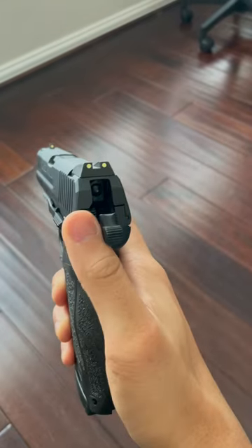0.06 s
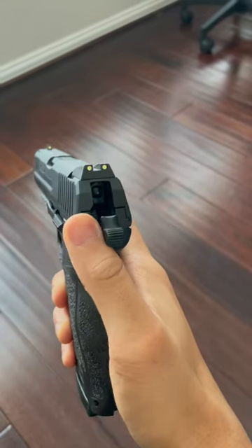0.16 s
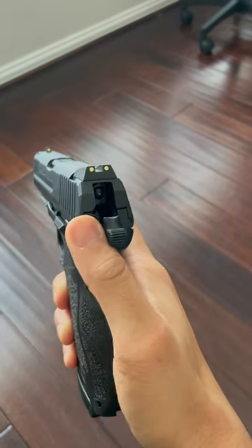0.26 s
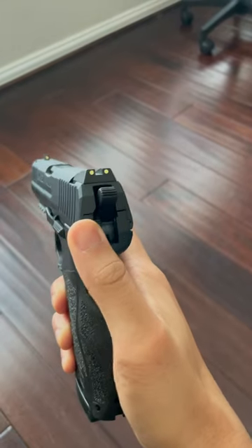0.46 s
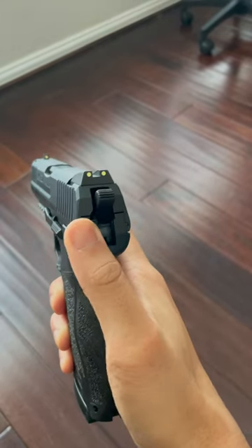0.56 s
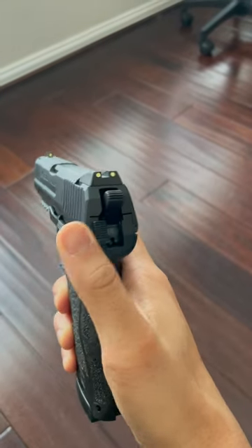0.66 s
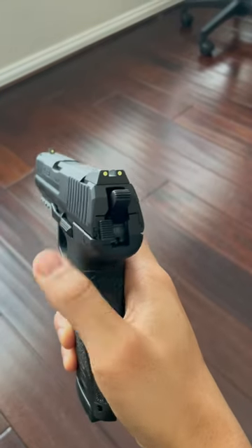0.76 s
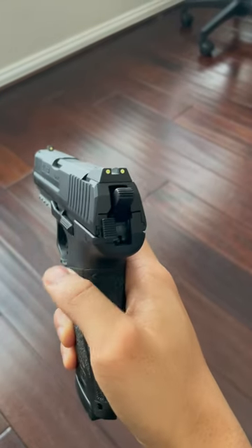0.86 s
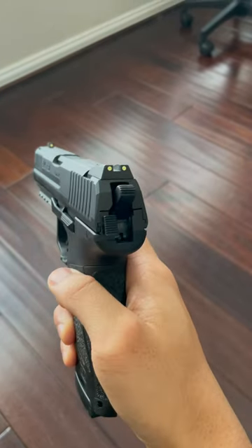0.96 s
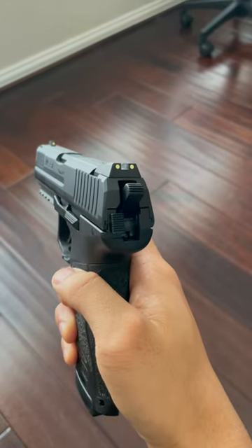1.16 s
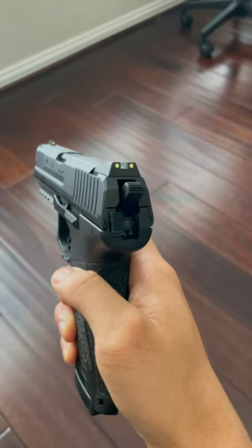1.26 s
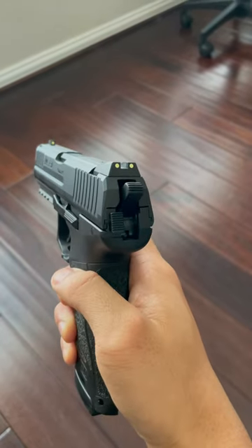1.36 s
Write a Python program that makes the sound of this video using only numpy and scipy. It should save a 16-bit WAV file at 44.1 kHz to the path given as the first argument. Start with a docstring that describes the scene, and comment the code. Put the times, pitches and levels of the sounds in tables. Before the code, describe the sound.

One crisp, close steel click sounds as a pistol is decocked in a quiet room. Its echo lingers briefly as a faint hiss, leaving only a low ventilation rumble and electrical hum.

```python
"""A quiet room with a wooden floor, a stereo microphone close to a pistol being decocked.
The sear lets go and the hammer clatters down in about fifteen milliseconds, ringing the steel
and jolting the frame in the hand. The recorder's limiter ducks on the click and recovers,
so the room's ring swells back as a soft hiss over ventilation rumble and a low mains hum."""
import sys
import numpy as np
from scipy import signal
from scipy.fft import rfft, irfft, next_fast_len
from scipy.io import wavfile
from scipy.ndimage import uniform_filter1d, minimum_filter1d

SR = 44100
rng = np.random.default_rng(int(sys.argv[2]) if len(sys.argv) > 2 else 0)


def generate_wav(signal):
    """Clip the signal to [-1, 1] and save it as 16-bit WAV at the path in sys.argv[1]."""
    frames = np.transpose(np.atleast_2d(signal))
    scaled = np.clip(frames, -1, 1) * 32767
    pcm = np.round(scaled).astype(np.int16)
    wavfile.write(sys.argv[1], SR, pcm)


N = 61739


def from_db(db):
    """Decibels to gain."""
    return 10 ** (np.asarray(db) / 20)


def rms_one(x):
    """Scale to rms 1."""
    return x / np.sqrt(np.mean(x ** 2) + 1e-20)


def at_hz(points, hz):
    """Read a table on a log-frequency axis."""
    freqs_hz, values = np.transpose(points)
    return np.interp(np.log(np.maximum(hz, 1)), np.log(freqs_hz), values)


def shaped(x, response):
    """Filter by a response given as a function of frequency."""
    size = next_fast_len(2 * N)
    spectrum = rfft(x, size)
    hz = np.arange(spectrum.shape[-1]) * SR / size
    return irfft(spectrum * response(hz), size)[..., :N]


def coloured(x, colour):
    """Filter by a table of freq_hz, gain_db."""
    return shaped(x, lambda hz: from_db(at_hz(colour, hz)))


def decay(start_s, t60_s):
    """Envelope that jumps to 1 and dies away."""
    age_s = np.arange(N) / SR - start_s
    return (age_s >= 0) * 1000 ** (-np.clip(age_s / t60_s, 0, 10))


# Stereo width of the room at the microphone: freq_hz, side_minus_mid_db
ROOM_WIDTH = [(60, -35), (250, -16), (600, 0), (1700, -13), (3100, -1), (4200, -6.5), (5000, -1.5),
              (6500, -15.5), (10000, -43), (14000, -12)]
def diffuse_noise():
    """Sound from all around, alike in both channels in the bass and less so above."""
    mid, side = rng.standard_normal((2, N))
    width = lambda hz: from_db(at_hz(ROOM_WIDTH, hz))
    mid = shaped(mid, lambda hz: 1 / np.hypot(1, width(hz)))
    side = shaped(side, lambda hz: width(hz) / np.hypot(1, width(hz)))
    return np.array([mid + side, mid - side])


def tones(table):
    """Steady sines at the given rms levels, each with a random phase."""
    t = np.arange(N) / SR
    return sum(from_db(db) * np.sqrt(2) * np.sin(2 * np.pi * (hz * t + rng.random())) for hz, db in table)


# Ventilation rumble all round the microphone: freq_hz, gain_db
VENT_COLOUR = [(5, -29.5), (18, -6), (30, -5), (58, 6.5), (90, -5.5), (135, 4.5), (180, -8), (260, -8.5),
               (350, -19.5), (600, -29), (850, -39), (1200, -44.5), (2500, -52.5), (6000, -58.5),
               (16000, -69)]
# Mains hum in the background: pitch_hz, level_db
MAINS_HUM = [(119, -54.5), (241, -65)]
# Faint whines in the background: pitch_hz, level_db
FAINT_WHINES = [(797, -88), (851, -83)]
def ventilation(rumble_db=-48, whine_from_s=0.3, whine_fade_s=0.1):
    """Room tone: steady low rumble and mains hum, with faint whines fading in after the click."""
    rumble = from_db(rumble_db) * rms_one(coloured(diffuse_noise(), VENT_COLOUR))
    fade_in = np.clip((np.arange(N) / SR - whine_from_s) / whine_fade_s, 0, 1)
    return rumble + tones(MAINS_HUM) + tones(FAINT_WHINES) * fade_in


# Colour of the reflections reaching the microphone: freq_hz, gain_db
REFLECTION_COLOUR = [(100, -16.5), (350, -25), (600, -8.5), (920, -6.5), (1250, -3), (1580, -2.5),
                     (1900, 4.5), (2400, 2), (3050, -6), (3700, 6.5), (4300, 1), (4800, -2), (6300, 5),
                     (8800, 3), (10300, -24), (12200, 4.5), (13800, -2), (15500, -21)]
# How long the room rings: freq_hz, t60_s
ROOM_DECAY = [(200, 0.41), (800, 0.9), (2000, 0.87), (4000, 0.83), (7000, 0.71), (10000, 0.51),
              (14000, 0.45)]
def room(x, delay_s=0.0042, early_db=-37.5, early_t60_s=0.05, late_db=-49.5):
    """Quick reflections off hand, body and floor, then a diffuse ring whose treble fades early."""
    noise = coloured(diffuse_noise(), REFLECTION_COLOUR)
    early = noise[:, ::-1] * decay(delay_s, early_t60_s)
    centres_hz, t60s_s = np.transpose(ROOM_DECAY)
    late = np.zeros((2, N))
    for share, t60_s in zip(np.eye(len(centres_hz)), t60s_s):
        band = shaped(noise, lambda hz: at_hz(np.c_[centres_hz, share], hz))
        late += band * decay(delay_s, t60_s)
    reflections = from_db(late_db) * late + from_db(early_db) * early
    return signal.fftconvolve(x[None], reflections, axes=1)[:, :N]


# Swings of the frame in the hand, heard close up: start_s, pitch_hz, level_db, t60_s
FRAME_SWINGS = [(0.2419, 443.2, 12, 0.0082), (0.2430, 209.2, 1.5, 0.0098), (0.2450, 89.85, 4.5, 0.028),
                (0.2505, 45.4, -7, 0.071)]
def frame_jolt(low_cut_hz=35):
    """The stopped hammer knocks the frame, which thumps into the hand and rocks to and fro."""
    t = np.arange(N) / SR
    thump = np.zeros(N)
    for k, (start_s, hz, level_db, t60_s) in enumerate(FRAME_SWINGS):
        swing = decay(start_s, t60_s) * np.sin(2 * np.pi * hz * (t - start_s))
        thump += (-1) ** k * from_db(level_db) * swing
    low_cut = signal.butter(1, low_cut_hz, "high", fs=SR, output="sos")
    return signal.sosfilt(low_cut, thump + 1e-18)


# Steel striking steel close to the microphone, with a level for each of five bands, low to high:
# start_s, knock_db, clack_db, ring_db, crack_db, sizzle_db
STEEL_CONTACTS = [(0.227, -28.5, -15, -18, -46, -50.5), (0.232, -5.5, 2, 0, -24, -31),
                  (0.2324, -13, -9.5, 8.5, -16, -25.5), (0.2345, -3.5, 4, 6.5, -9, 2),
                  (0.2379, 3.5, -5.5, -9.5, 9, 7), (0.2396, -20, 6.5, -10.5, 13, 7),
                  (0.2422, -7, -3, 0, 7, 0.5)]
# Borders of those five bands: edge_hz
BAND_EDGES_HZ = [250, 1500, 3800, 6000, 11000, 16000]
# Resonances that colour every contact: freq_hz, gain_db
GRIT_COLOUR = [(300, -8.5), (640, 1), (760, -6), (900, 5), (1150, -11), (1600, 1), (2100, 2.5), (2600, 3),
               (3000, 9), (3600, -1), (4700, 2.5), (5600, -3.5), (6800, -7), (7600, -7), (9000, 0.5),
               (12000, 3.5), (14400, -9), (15300, -1)]
def contact_grit(gain_db=-0.5, t60_s=0.011):
    """Each steel contact is a gritty burst of a few milliseconds with its own colour."""
    noise = coloured(rng.standard_normal(N), GRIT_COLOUR)
    bands = [signal.sosfilt(signal.butter(3, edges_hz, "band", fs=SR, output="sos"), noise)
             for edges_hz in zip(BAND_EDGES_HZ, BAND_EDGES_HZ[1:])]
    grit = np.zeros(N)
    for start_s, *levels_db in STEEL_CONTACTS:
        envelope = decay(start_s, t60_s)
        envelope_rms = np.sqrt(np.mean(envelope ** 2))
        for band, level_db in zip(bands, levels_db):
            burst = envelope * np.roll(band, rng.integers(N))
            grit += from_db(gain_db + level_db) * envelope_rms * rms_one(burst)
    return grit


# Ring of slide and hammer, heard close up: pitch_hz, level_db, t60_s
SLIDE_HAMMER_MODES = [(685.3, -26, 0.015), (838.4, -22, .05), (2594, -11, .035), (2833, -10.5, .03),
                      (4324, -18.5, .035), (4830, -7.5, .012), (5030, -14, 0.037), (7060, -28.5, .02),
                      (12850, -20, .025), (13700, -21.5, .02), (15200, -12, .02)]
def steel_ring():
    """Every contact sets slide and hammer ringing, each mode as hard as the contact is in its band."""
    starts_s, *levels_db = np.transpose(STEEL_CONTACTS)
    ringing = np.zeros(N)
    for hz, mode_db, t60_s in SLIDE_HAMMER_MODES:
        band_index = np.searchsorted(BAND_EDGES_HZ[1:-1], hz)
        blows = np.full(N, 1e-18)
        blows[(starts_s * SR).astype(int)] = from_db(mode_db + levels_db[band_index])
        radius, angle = from_db(-60 / (t60_s * SR)), 2 * np.pi * hz / SR  # two-pole resonator
        ringing += signal.lfilter([0, np.sin(angle)], [1, -2 * radius * np.cos(angle), radius ** 2], blows)
    return ringing


# Stereo phase between left and right, nearly opposite around 10 kHz: freq_hz, phase_rad
STEREO_PHASE = [(2400, 0), (4000, .6), (5500, .45), (7000, 1.3), (8200, 2.1), (9400, 2.85), (10200, 3.14),
                (11100, 3.4), (12200, 4.3), (14000, 6.1), (16000, 6.3)]
def scene():
    """The pistol radiates a different grit forwards and back; both fill the room."""
    body = steel_ring() + frame_jolt()
    towards, away = body + contact_grit(), body + contact_grit()
    at_microphone = towards + room(towards) + room(away)
    phase_shift = lambda hz: np.exp(0.5j * np.outer([1, -1], at_hz(STEREO_PHASE, hz)))
    return shaped(at_microphone, phase_shift) + ventilation()


def limiter(x, limit_db=-13, detect_s=0.015, lookahead_s=0.004, hold_s=0.1, release_db_per_s=93.5):
    """Ducks just ahead of a loud sound, holds, then recovers at a steady rate."""
    hold, ahead = int(hold_s * SR), int(lookahead_s * SR)
    power = uniform_filter1d(np.mean(x ** 2, axis=0), int(detect_s * SR))
    over_db = np.maximum(10 * np.log10(np.maximum(power, 1e-12)) - limit_db, 0)
    held_db = -minimum_filter1d(-over_db, hold, origin=(hold - 1) // 2, mode="constant")
    ramp_db = release_db_per_s * np.arange(N) / SR
    cut_db = np.maximum.accumulate(held_db + ramp_db) - ramp_db
    early_cut_db = np.pad(cut_db[ahead // 2:], (0, ahead // 2), "edge")
    return x * from_db(-uniform_filter1d(early_cut_db, ahead))


def record(dry):
    """The recorder limits the click, rounds its peaks and cuts the highest treble."""
    ceiling, cutoff_hz = 0.72, 15700
    limited = limiter(dry)
    rounded = limited / (1 + (limited / ceiling) ** 4) ** 0.25
    high_cut = signal.ellip(10, 0.1, 80, cutoff_hz, fs=SR, output="sos")
    return signal.sosfilt(high_cut, rounded)


dry = scene()
out = record(dry)
generate_wav(out)
```